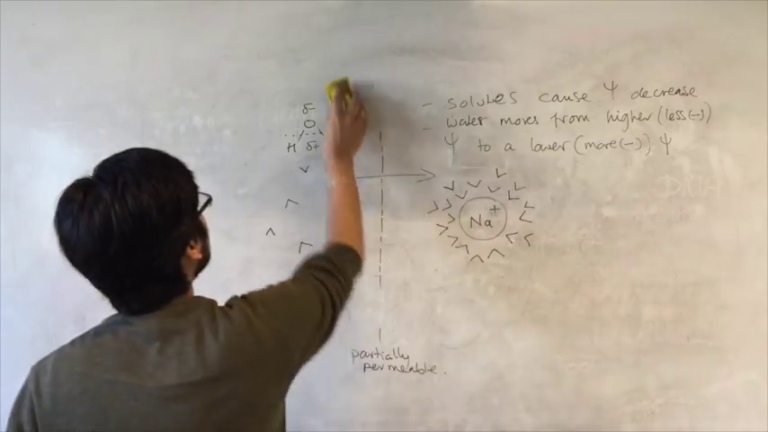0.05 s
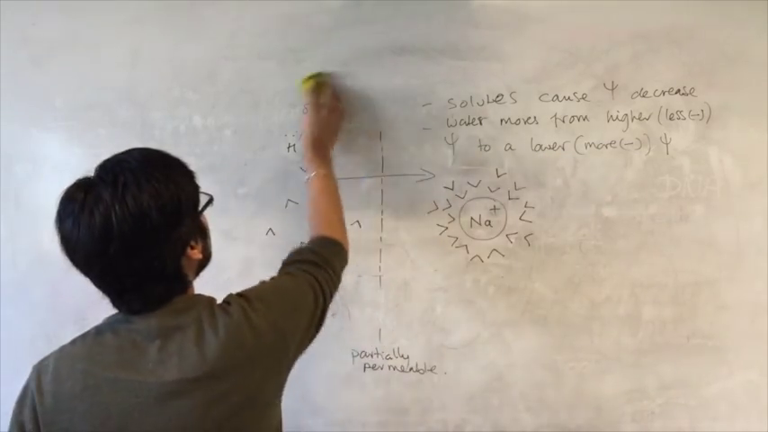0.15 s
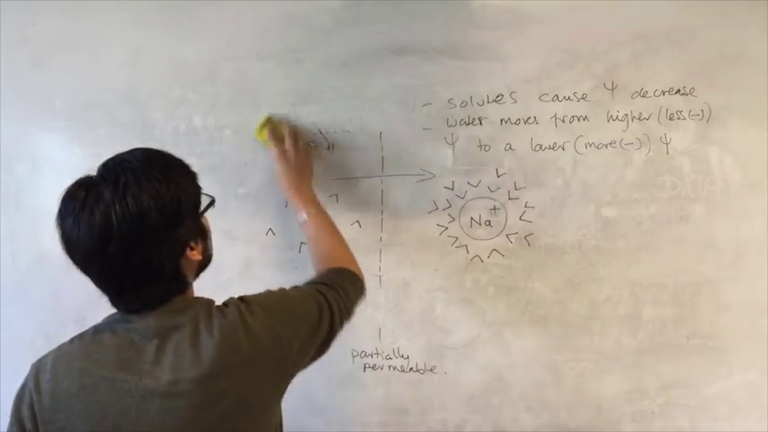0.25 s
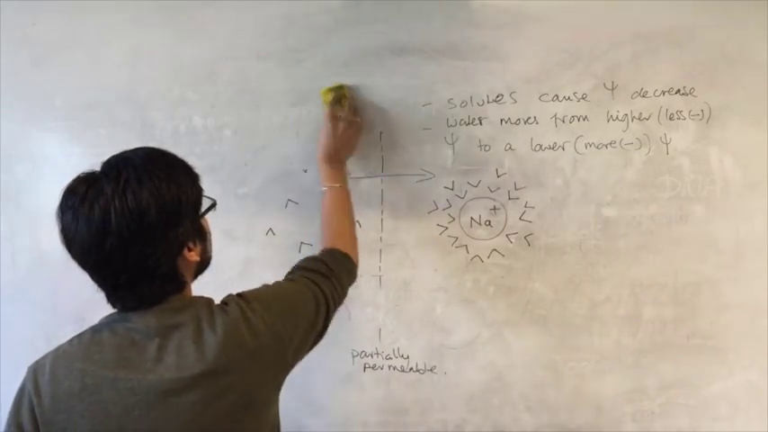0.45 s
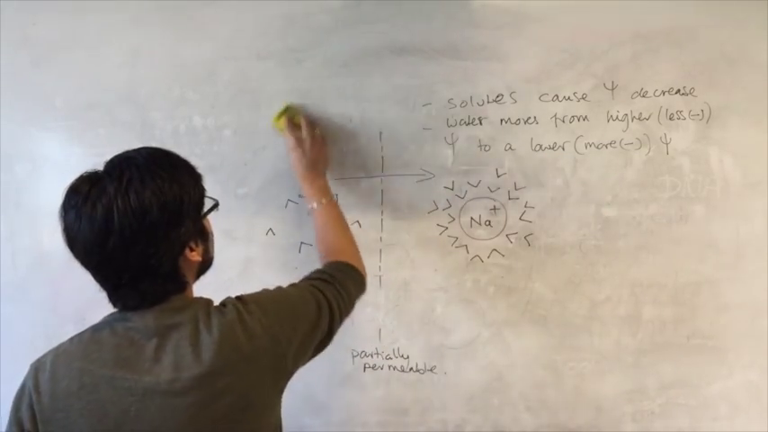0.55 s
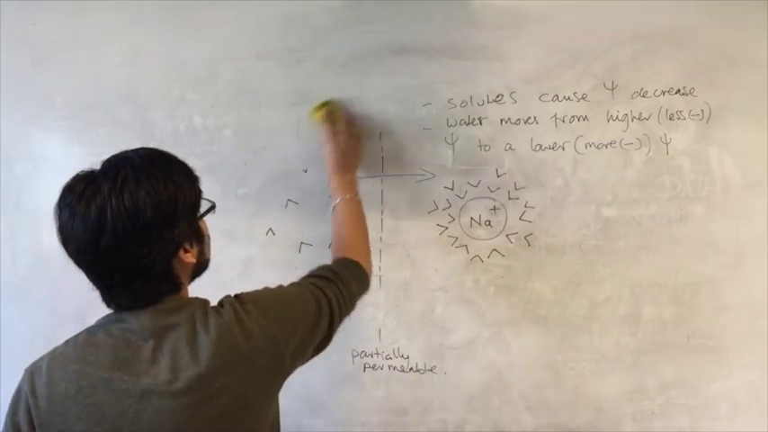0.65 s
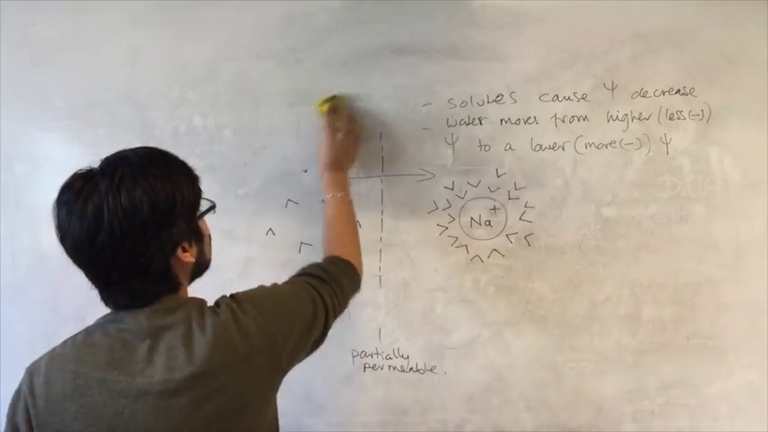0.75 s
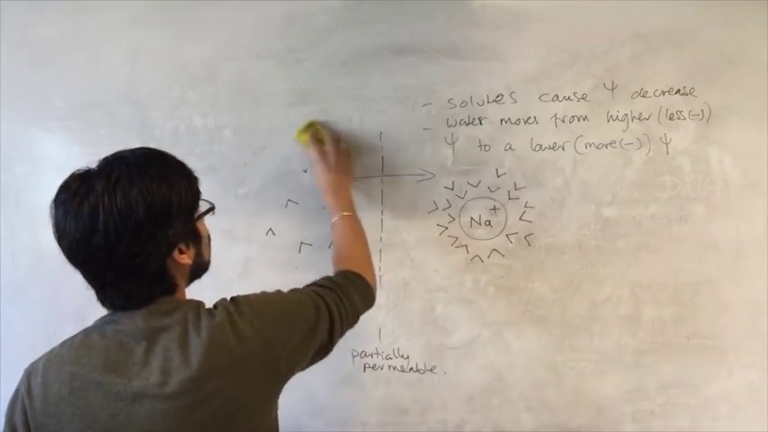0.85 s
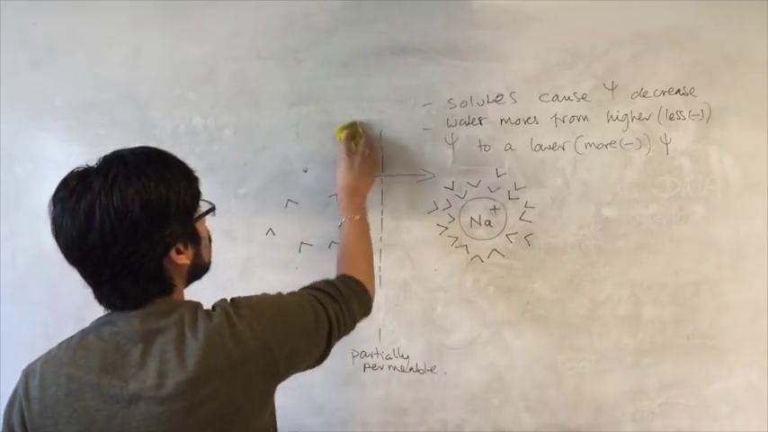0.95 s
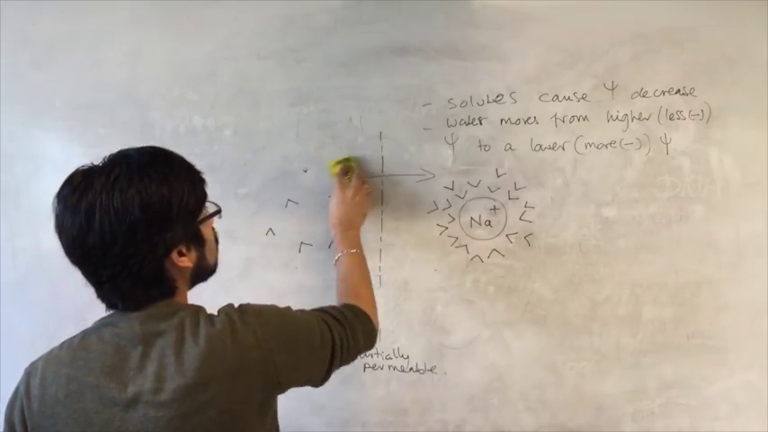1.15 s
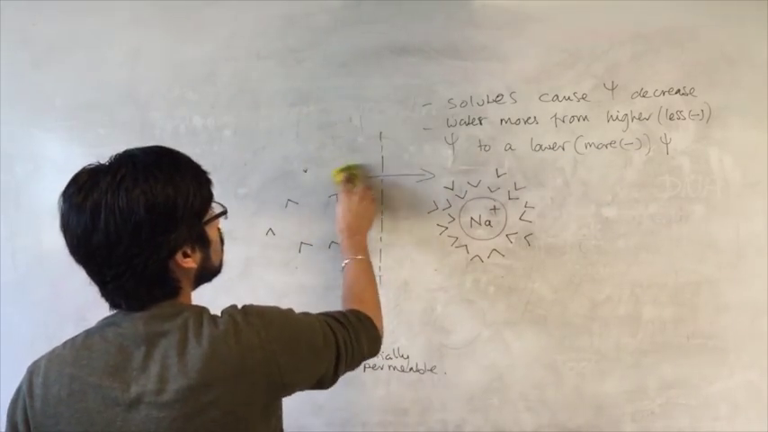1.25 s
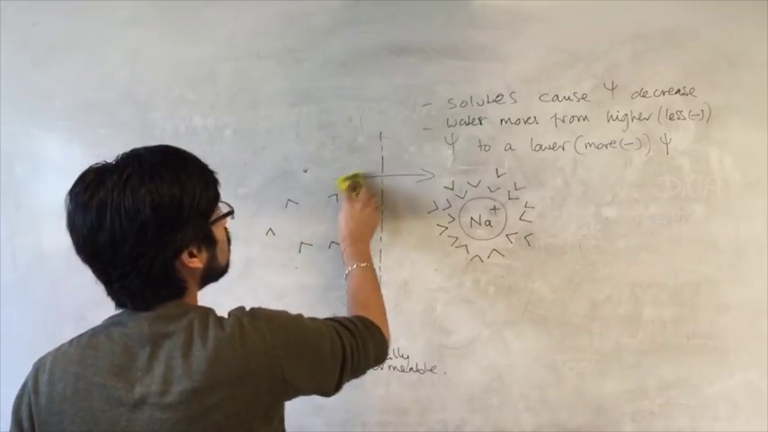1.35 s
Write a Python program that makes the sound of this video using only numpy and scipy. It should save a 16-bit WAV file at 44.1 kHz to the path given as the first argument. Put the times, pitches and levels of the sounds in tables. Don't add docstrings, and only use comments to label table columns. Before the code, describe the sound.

A dry sponge scuffs across a hollow whiteboard after a hard bang, with small knocks following

```python
import sys
import numpy as np
from scipy import signal
from scipy.fft import rfft, irfft
from scipy.io import wavfile
from scipy.ndimage import uniform_filter1d

SR = 44100
rng = np.random.default_rng(int(sys.argv[2]) if len(sys.argv) > 2 else 0)


def attenuation_scalar(level_db):
    decades = np.asarray(level_db, float) / 20
    return 10 ** decades


def put_to_file(sound):
    columns = np.atleast_2d(sound).T
    safe = np.clip(columns, -1, 1)
    whole_steps = np.round(safe * 32767)
    wavfile.write(sys.argv[1], SR, whole_steps.astype(np.int16))


N = 61739
TIME_S = np.arange(N) / SR


def evened(x):
    return x / np.sqrt(np.mean(x ** 2) + 1e-20)


def read(points, hz):
    f, value = np.transpose(points)
    return np.interp(np.log(hz + 1), np.log(f + 1), value)


def noise(points, tilt_db=0, below_db=0):
    hz = np.fft.rfftfreq(N, 1 / SR) + 1
    db = read(points, hz) + tilt_db * np.log2(hz / 1000)
    db = db + below_db * np.minimum(np.log2(hz / points[0][0]), 0)
    return evened(irfft(rfft(rng.standard_normal(N)) * attenuation_scalar(db), N))


def body(peaks, tilt_db=0):
    hz = np.fft.rfftfreq(N, 1 / SR) + 1
    shape = sum(attenuation_scalar(db) / (1 + ((hz - f) / (width / 2)) ** 2) ** 0.64 for f, width, db in peaks)
    shape = shape * attenuation_scalar(tilt_db * np.log2(hz / 1000))
    return evened(irfft(rfft(rng.standard_normal(N)) * shape, N))


def struck(start_s, t60_s, rise_s):
    t = np.maximum(TIME_S - start_s, 0)
    return np.minimum(t / rise_s, 1) * attenuation_scalar(-60 * t / t60_s)


def rung(start_s, modes, spread=0):
    t = np.maximum(TIME_S - start_s, 0)
    out = np.zeros(N)
    for hz, db, t60_s in modes:
        detuned_hz = hz * (1 + spread * rng.standard_normal())
        out += attenuation_scalar(db - 60 * t / t60_s) * np.sin(2 * np.pi * detuned_hz * t)
    return out


# (start [s], length [s], level [dB])
STROKE_EVENTS = [
    (0.13, 0.18, -94),
    (0.233, 0.23, -57),
    (0.427, 0.14, -52),
    (0.54, 0.19, -59.5),
    (0.7, 0.15, -58.5),
    (0.836, 0.14, -59),
    (0.941, 0.16, -62),
    (1.087, 0.092, -64.5),
    (1.17, 0.084, -68),
    (1.262, 0.11, -68.5),
]
# (frequency [Hz], density [dB per Hz])
FELT_SPECTRUM = [(1500, -10), (2500, -0.5), (4200, -4), (6000, -3.5), (8500, -6.5), (12000, -7),
                 (13500, -9.5), (15300, -9)]
FIZZ_HZ, FIZZ_POWER = 8000, 1.9


def sponge():
    grain = attenuation_scalar(1.1 * evened(uniform_filter1d(rng.standard_normal(N), size=200)))
    high_pass = signal.butter(2, FIZZ_HZ, "high", fs=SR, output="sos")
    fizz = evened(signal.sosfilt(high_pass, rng.standard_normal(N)))
    rub_level, fizz_level = np.zeros(N), np.zeros(N)
    for start_s, length_s, db in STROKE_EVENTS:
        speed = np.sin(np.pi * np.clip((TIME_S - start_s) / length_s, 0, 1)) ** 2
        rub_level += attenuation_scalar(db) * speed ** 0.39
        fizz_level += attenuation_scalar(db) * speed ** (FIZZ_POWER / 2)
    return grain * (rub_level * noise(FELT_SPECTRUM, below_db=-2.0) + fizz_level * fizz)


# (start [s], length [s], level [dB], tilt [dB per octave], tray ring [dB])
SCUFF_EVENTS = [(.1185, .05, -59.5, 0.5, -63), (0.563, 0.049, -50.5, 13.5, -56.5),
                (0.638, 0.023, -58, -1, -61.5), (0.748, 0.039, -56, 2, -57), (.8615, 0.027, -52, 0.5, -50),
                (.916, 0.035, -54.5, 0, -57), (0.965, .025, -61, -4.5, -62.5),
                (1.081, 0.017, -63.5, -1.5, -78), (1.121, 0.032, -50, 2.5, -55),
                (1.153, 0.023, -46.5, -4, -55.5), (1.193, 0.042, -65, 7, -67),
                (1.235, 0.031, -59.5, -4.5, -66)]
# (frequency [Hz], level [dB])
TRAY_MODES = [(490, -1.5), (865, -4.5)]
# (frequency [Hz], width [Hz], level [dB])
FACE_PEAKS = [(424, 600, -8.5), (690, 300, 0), (1200, 100, -13), (1800, 480, -7), (2440, 400, -12.5),
              (2960, 500, -8)]
FACE_TOP_HZ = 3400
SNAP_DB, SNAP_S = 6, 0.003
SCUFF_SAG_DB_PER_S, SCUFF_T60_S = -200, 0.12


def knocks():
    out = np.zeros(N)
    for start_s, length_s, db, tilt_db, ring_db in SCUFF_EVENTS:
        u = np.maximum(TIME_S - start_s, 0)
        fall_db = SNAP_DB * np.exp(-u / SNAP_S) + SCUFF_SAG_DB_PER_S * u
        fall_db = fall_db - 60 * np.maximum(u - length_s, 0) / SCUFF_T60_S
        shape = np.minimum(u / 0.0006, 1) * attenuation_scalar(fall_db)
        scuff = attenuation_scalar(db) * body(FACE_PEAKS, tilt_db)
        tray = sum(attenuation_scalar(mode_db) * np.sin(2 * np.pi * hz * rng.uniform(0.96, 1.02) * u)
                   for hz, mode_db in TRAY_MODES)
        out += shape * (scuff + attenuation_scalar(ring_db) * tray)
    return signal.sosfilt(signal.butter(8, FACE_TOP_HZ, fs=SR, output="sos"), out)


# (start [s], length [s], level [dB], pitch [Hz])
BOOM_EVENTS = [(.118, 0.015, -53.5, 350), (.128, 0.016, -51.5, 278), (.848, 0.0078, -38.5, 155),
               (.866, 0.0067, -42, 150), (1.121, 0.044, -38, 165.4), (1.2, 0.015, -58, 160),
               (1.228, 0.0083, -50.5, 143), (1.245, 0.028, -45.5, 165), (1.075, 0.017, -53.5, 150),
               (1.312, 0.039, -65.5, 167.7), (.98, 0.033, -54.5, 129)]
BOOM_RISE_S, BOOM_FALL_S, BOOM_SAG_S = 0.004, 0.006, 0.15


def booms():
    out = np.zeros(N)
    for start_s, length_s, db, hz in BOOM_EVENTS:
        u = np.maximum(TIME_S - start_s, 0)
        damping = np.exp(-np.maximum(u - length_s, 0) / BOOM_FALL_S - u / BOOM_SAG_S)
        out += attenuation_scalar(db) * np.minimum(u / BOOM_RISE_S, 1) * damping * np.sin(2 * np.pi * hz * u)
    return out


# (frequency [Hz], level [dB], t60 [s])
PANEL_MODES = [(172.3, -12.5, 0.043), (150, -23, 0.11), (218.4, -22.5, 0.033), (294.7, -22, 0.34),
               (389.3, -26.5, 0.29), (437, -24, 0.032), (489.5, -30, .1), (664.3, -32, .1), (862, -38, .1),
               (1010, -44, 0.11)]
# (time [s], level [dB], t60 [s], tilt [dB per octave])
SLAP_EVENTS = [
    (.2265, -29, .02, 4),
    (0.233, -21.5, 0.029, -1),
    (.243, -25, 0.065, 4),
    (0.258, -33, 0.042, 3.5),
]
# (frequency [Hz], density [dB per Hz])
SLAP_SPECTRUM = [(500, -12.5), (800, -4.5), (1400, -13), (2200, -18), (3080, -19), (5540, -37.5),
                 (9000, -51.5), (15300, -74)]
# (frequency [Hz], level [dB], t60 [s])
CRACK_MODES = [(1070, -14.5, 0.01), (1383, -22.5, 0.021), (1800, -20, .025), (2236, -22.5, 0.015),
               (2840, -40, .02)]
PUSH_S, PUSH_DB = 0.2175, -9
BLOW_S, BLOW_RISE_S, BLOW_HOLD_S = 0.2295, 0.007, 0.027
CRACK_S, CRACK_RISE_S, CRACK_DB = 0.2266, 0.0007, 4


def blow():
    lead = np.clip((TIME_S - PUSH_S) / (BLOW_S - PUSH_S), 0, 1)
    landing = np.clip((TIME_S - BLOW_S) / BLOW_RISE_S + 0.5, 0, 1) ** 2
    press = attenuation_scalar(PUSH_DB) * lead + landing
    released = np.maximum(TIME_S - BLOW_S - BLOW_HOLD_S, 0)
    ring = sum(attenuation_scalar(db - 60 * released / t60_s) * np.sin(2 * np.pi * hz * (TIME_S - BLOW_S - 0.002))
               for hz, db, t60_s in PANEL_MODES)
    crack_rise = np.clip((TIME_S - CRACK_S) / CRACK_RISE_S, 0, 1)
    crack = crack_rise * attenuation_scalar(CRACK_DB) * rung(CRACK_S, CRACK_MODES)
    slaps = sum(attenuation_scalar(db) * struck(start_s, t60_s, 0.00026) * noise(SLAP_SPECTRUM, tilt_db, below_db=23.5)
                for start_s, db, t60_s, tilt_db in SLAP_EVENTS)
    return press * ring - crack + slaps


# (time [s], level [dB])
TICK_EVENTS = [
    (.4708, -44),
    (.4718, -50),
    (.4728, -43),
    (.4745, -49),
    (.4765, -53),
]
# (frequency [Hz], level [dB], t60 [s])
BEAD_MODES = [(3580, -7, 0.021), (6920, 2.5, 0.0067), (7600, 5, 0.0055), (8550, -0.5, 0.018),
              (12000, -3, 0.014), (12900, -8, .015), (13600, -4, .015), (14560, -9, .015)]
# (frequency [Hz], width [Hz], level [dB])
RATTLE_PEAKS = [(3700, 550, 10), (6900, 3200, -19)]
BEAD_DB = 3.5
RATTLE_DB, RATTLE_T60_S = -47, 0.26


def bracelet():
    clinks = sum(attenuation_scalar(db + BEAD_DB) * rung(start_s, BEAD_MODES, spread=0.034) for start_s, db in TICK_EVENTS)
    rattle_shape = struck(TICK_EVENTS[1][0], RATTLE_T60_S, 0.0015)
    return clinks + attenuation_scalar(RATTLE_DB) * rattle_shape * body(RATTLE_PEAKS)


# (frequency [Hz], width [Hz], level [dB])
SQUEAK_PEAKS = [(2226, 150, 0)]
SQUEAK_S, SQUEAK_LENGTH_S, SQUEAK_DB = 0.142, 0.03, -61


def squeak():
    u = np.clip((TIME_S - SQUEAK_S) / SQUEAK_LENGTH_S, 0, 1)
    return attenuation_scalar(SQUEAK_DB) * np.sin(np.pi * u) * body(SQUEAK_PEAKS)


# (frequency [Hz], t60 [s])
ROOM_T60 = [(100, 0.94), (200, 0.67), (400, 0.63), (1000, 0.58), (2000, 0.63), (4000, 0.62), (9000, 0.42)]
ECHO_RISE_S = 0.0045


def classroom(x, colour):
    taps = np.zeros(SR)
    at = np.arange(40, SR - 20, 20)
    taps[at + rng.integers(0, 20, len(at))] = rng.choice([-1., 1.], len(at))
    hz, t, z = signal.stft(taps, SR, nperseg=1024, noverlap=768)
    decay_db = -60 * t / read(ROOM_T60, hz)[:, None] + read(colour, hz)[:, None]
    tail = signal.istft(z * attenuation_scalar(decay_db), SR, nperseg=1024, noverlap=768)[1]
    tail = tail * np.minimum(np.arange(len(tail)) / SR / ECHO_RISE_S, 1)
    return signal.fftconvolve(x, tail / np.linalg.norm(tail))[:N]


# (frequency [Hz], density [dB per Hz])
AIR_SPECTRUM = [(20, -16), (115, -5), (300, -9.5), (502, -17), (1160, -19.5), (2500, -19), (6000, -25),
                (15300, -31)]
# (time [s], level [dB])
AIR_LEVEL = [(0, -2.5), (.11, -4.5), (.13, 3.5), (.7, -1), (1.2, 0.5), (1.4, -1.5)]
AIR_DB = -60.5


def air():
    swell_db = 1.5 * evened(uniform_filter1d(rng.standard_normal(N), size=2000))
    lift_db = np.interp(TIME_S, *np.transpose(AIR_LEVEL))
    return attenuation_scalar(AIR_DB + swell_db + lift_db) * noise(AIR_SPECTRUM)


# (frequency [Hz], level [dB])
BLOW_COLOUR = [(90, -36), (135, 3), (180, 2.5), (290, 4.5), (450, -7.5), (700, -11), (2200, -20.5),
               (3800, -27), (6000, -52)]
BLOW_WET_DB, SMALL_WET_DB, BOOM_WET_DB = 13, -11.5, -17
GATE_S, GATE_DB_PER_S = 0.49, -64
LOW_CUT_HZ = 103


def scene():
    hard, small, low = blow(), knocks() + bracelet() + squeak(), booms()
    push = np.arange(N) == round(BLOW_S * SR)
    gate = attenuation_scalar(GATE_DB_PER_S * np.maximum(TIME_S - GATE_S, 0))
    wet = attenuation_scalar(BLOW_WET_DB) * classroom(push, BLOW_COLOUR) * gate
    wet += classroom(attenuation_scalar(SMALL_WET_DB) * small + attenuation_scalar(BOOM_WET_DB) * low, [(100, -2), (8000, -7.5)])
    high_pass = signal.butter(4, LOW_CUT_HZ, "high", fs=SR, output="sos")
    radiated = signal.sosfilt(high_pass, hard + small + low + wet)
    return (radiated + sponge() + air())[None]


def roll_off(x):
    return signal.sosfilt(signal.butter(12, 15630, fs=SR, output="sos"), x)


NOTCH_HZ, NOTCH_WIDTH_HZ, NOTCH_DB = 10420, 420, -4.5
EDGE_HZ = 15430


def record(dry):
    hz = np.fft.rfftfreq(2048, 1 / SR)
    notch = attenuation_scalar(NOTCH_DB * np.exp(-((hz - NOTCH_HZ) / NOTCH_WIDTH_HZ) ** 2))
    x = signal.oaconvolve(dry, np.roll(irfft(notch), 1024)[None], "same")
    low_pass = signal.firwin(511, EDGE_HZ, window=("kaiser", 9), fs=SR)
    x = signal.oaconvolve(x, low_pass[None], "same")
    return roll_off(x)


dry = scene()
out = record(dry)
put_to_file(out)
```